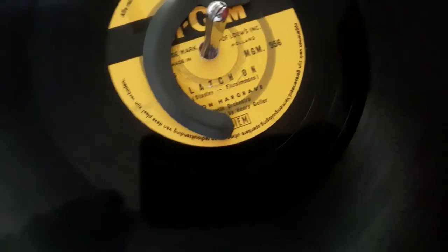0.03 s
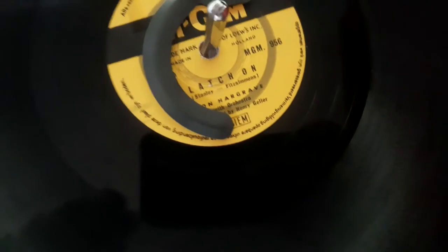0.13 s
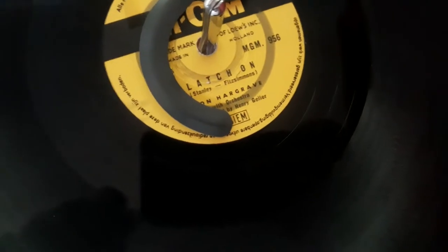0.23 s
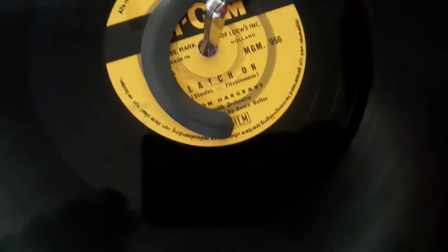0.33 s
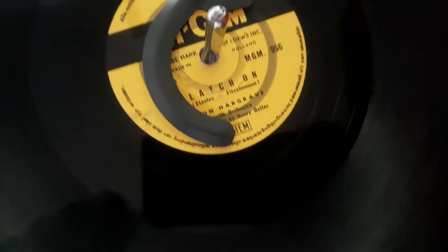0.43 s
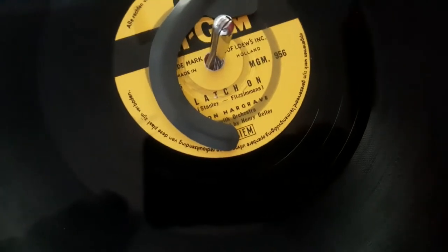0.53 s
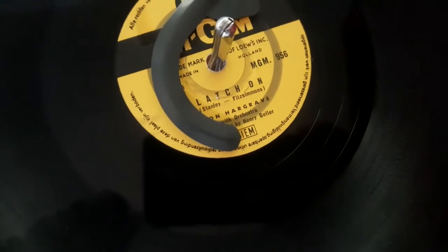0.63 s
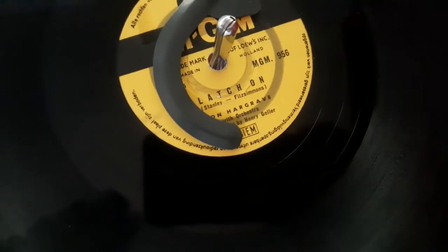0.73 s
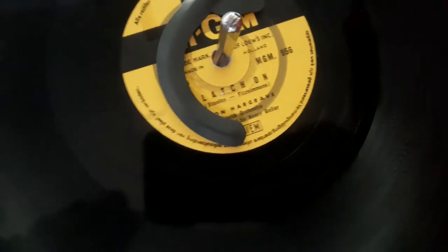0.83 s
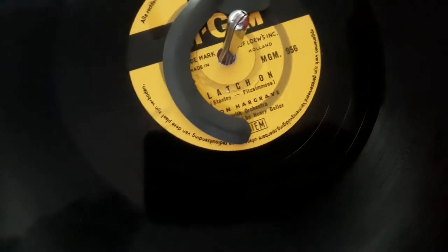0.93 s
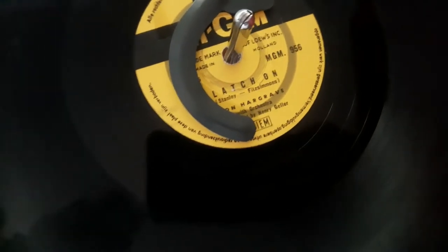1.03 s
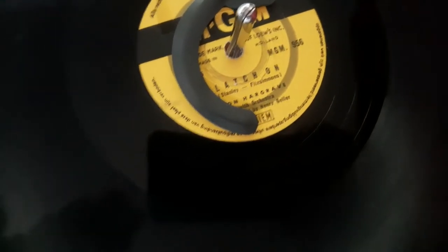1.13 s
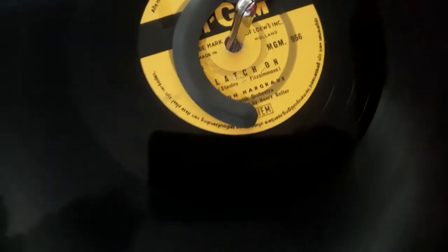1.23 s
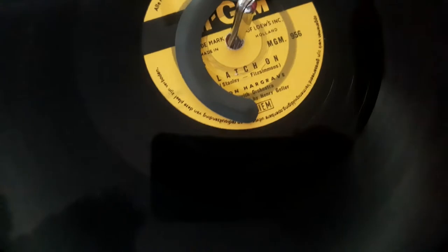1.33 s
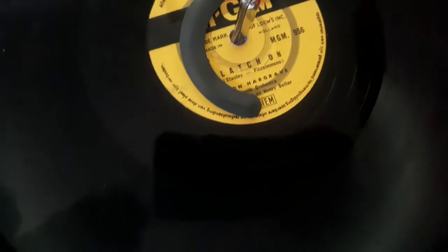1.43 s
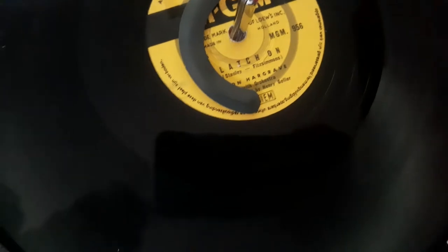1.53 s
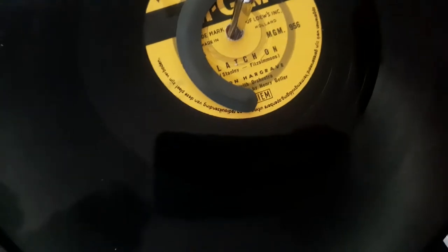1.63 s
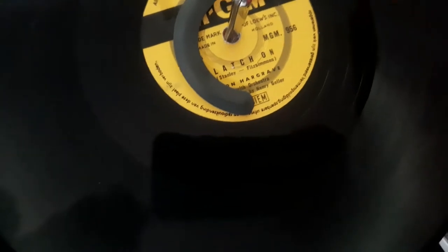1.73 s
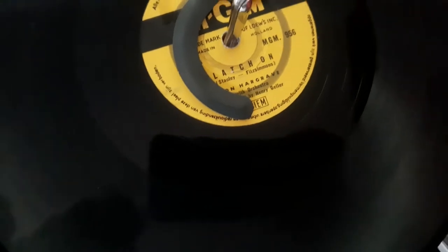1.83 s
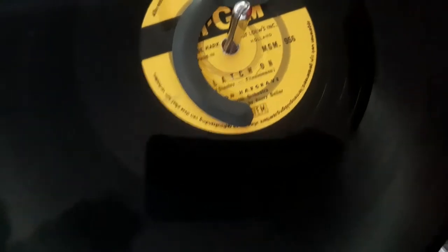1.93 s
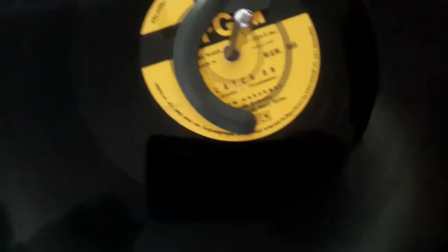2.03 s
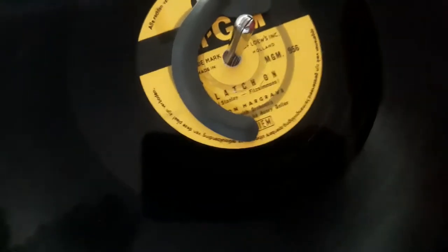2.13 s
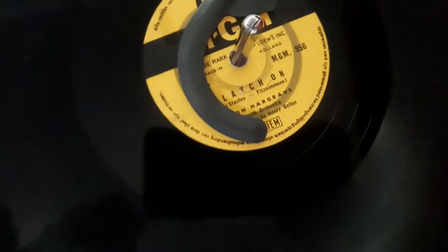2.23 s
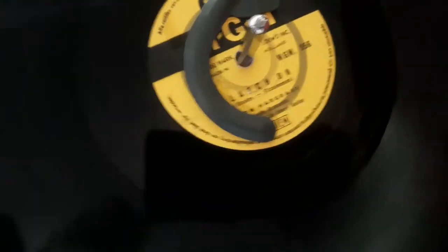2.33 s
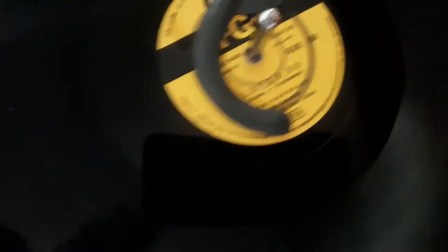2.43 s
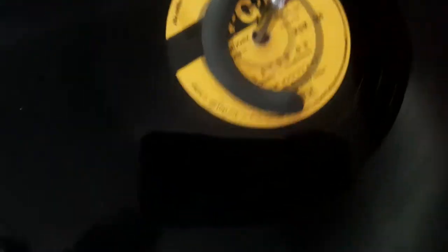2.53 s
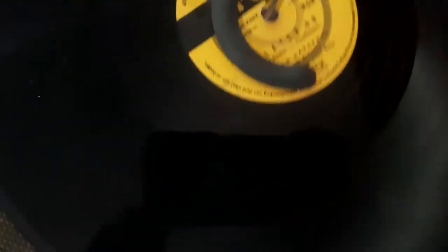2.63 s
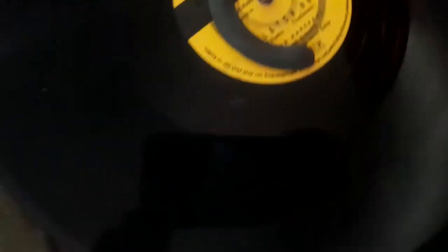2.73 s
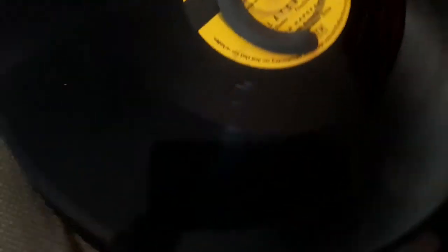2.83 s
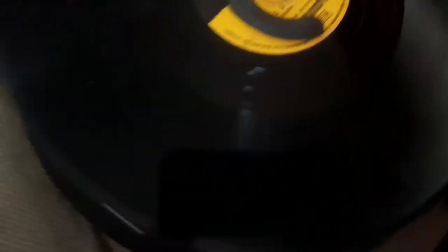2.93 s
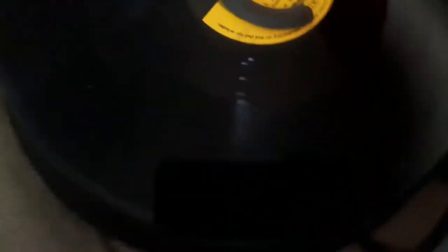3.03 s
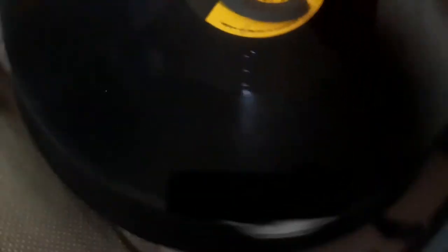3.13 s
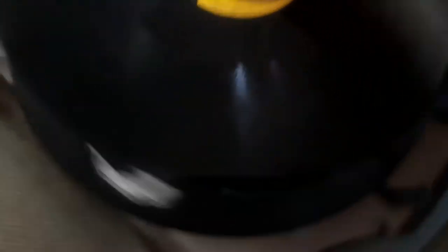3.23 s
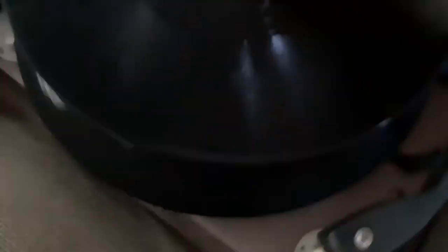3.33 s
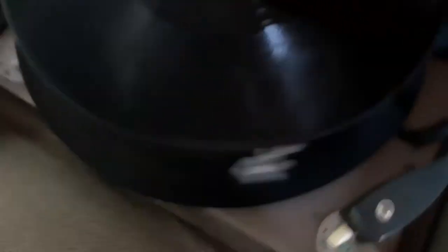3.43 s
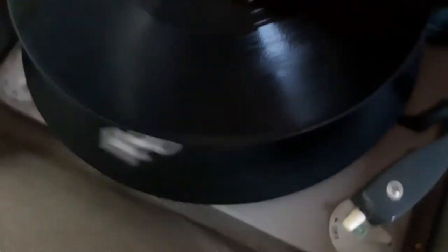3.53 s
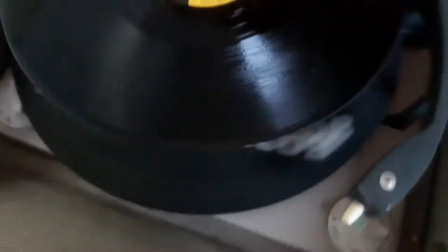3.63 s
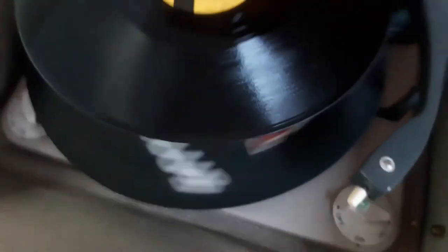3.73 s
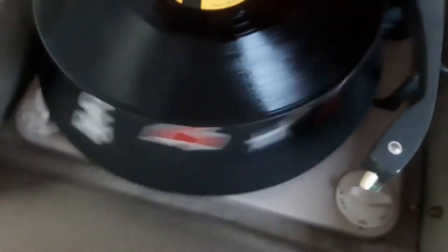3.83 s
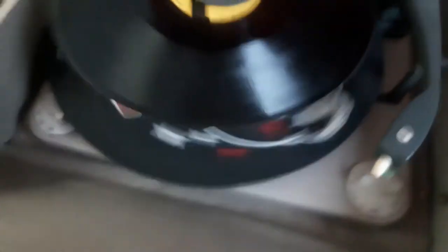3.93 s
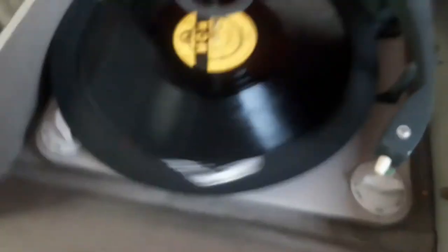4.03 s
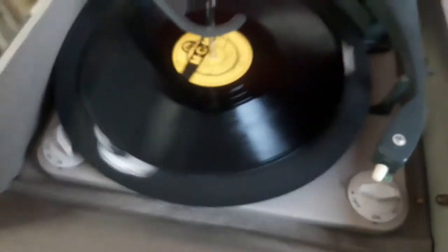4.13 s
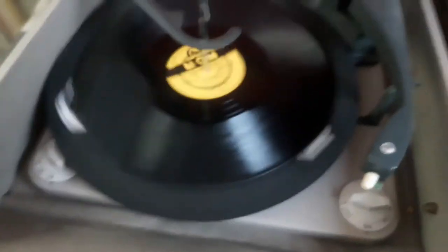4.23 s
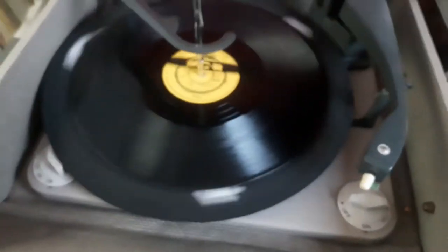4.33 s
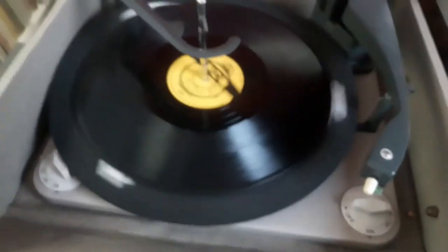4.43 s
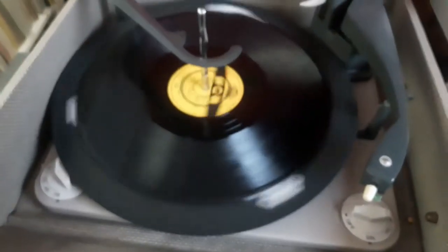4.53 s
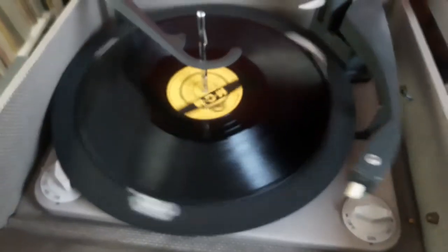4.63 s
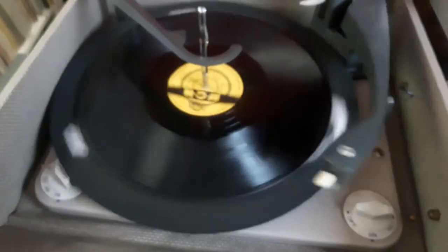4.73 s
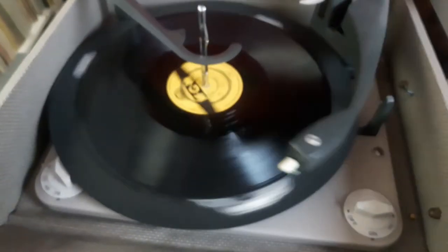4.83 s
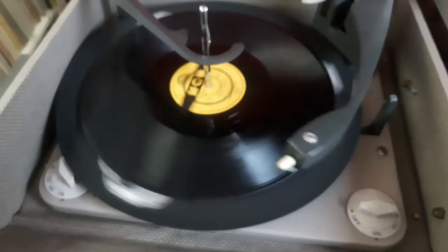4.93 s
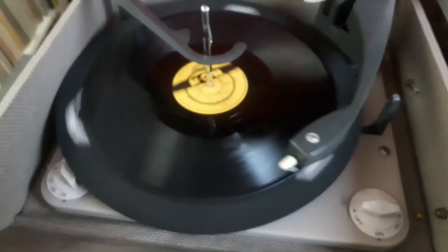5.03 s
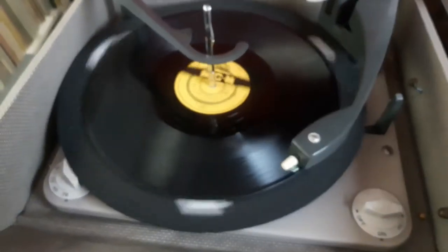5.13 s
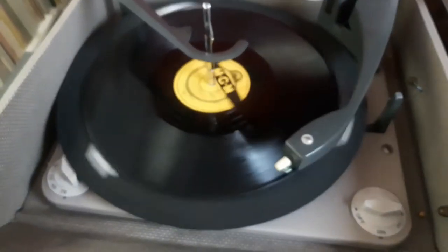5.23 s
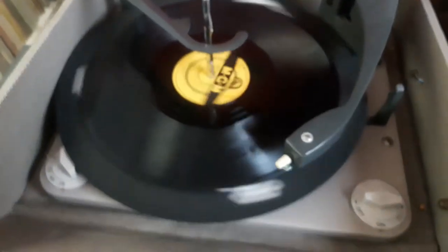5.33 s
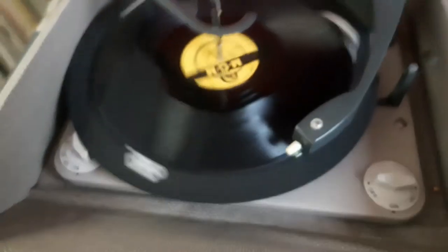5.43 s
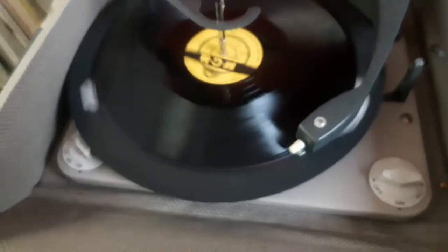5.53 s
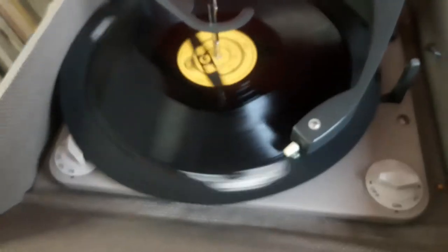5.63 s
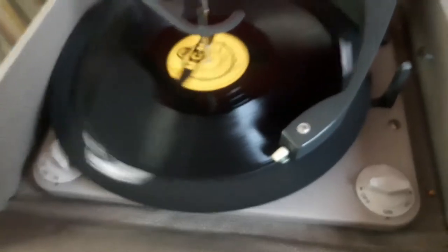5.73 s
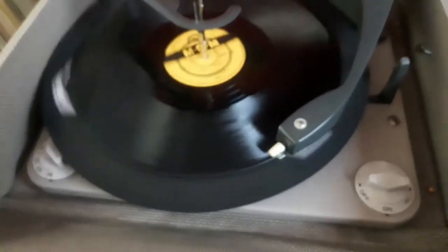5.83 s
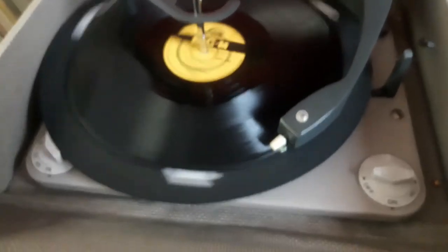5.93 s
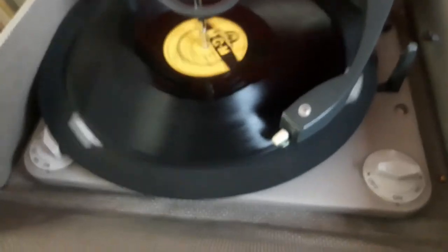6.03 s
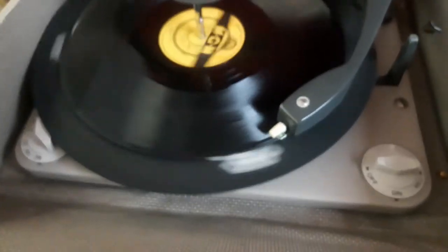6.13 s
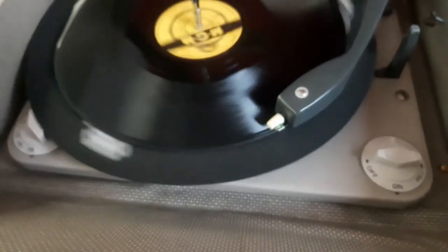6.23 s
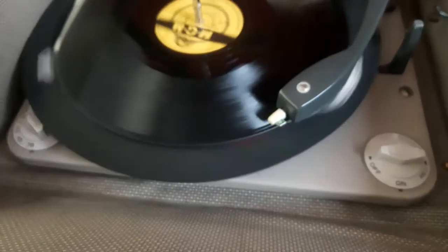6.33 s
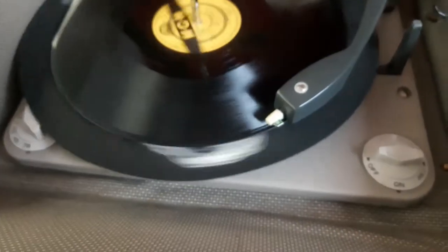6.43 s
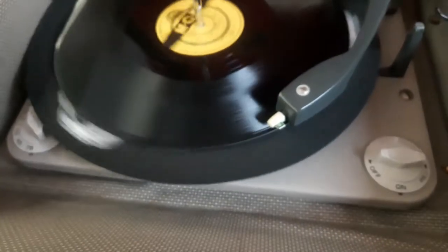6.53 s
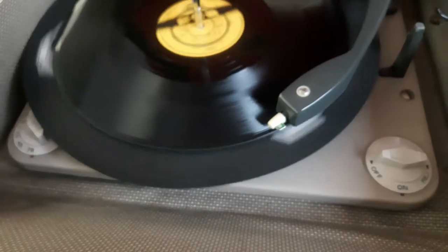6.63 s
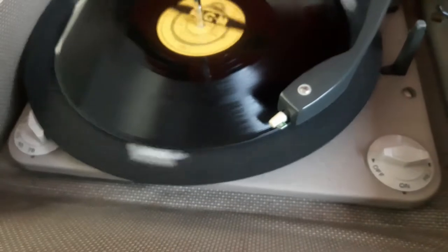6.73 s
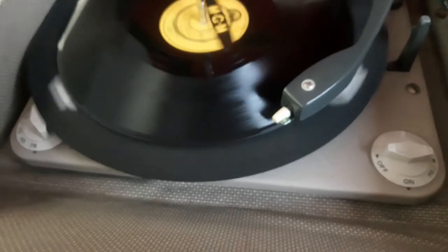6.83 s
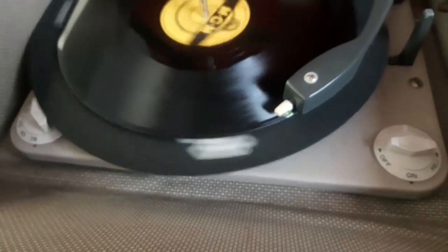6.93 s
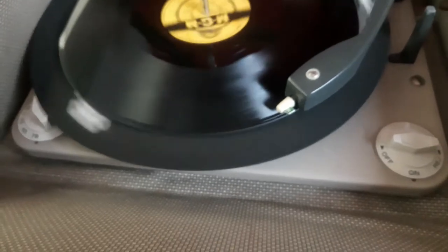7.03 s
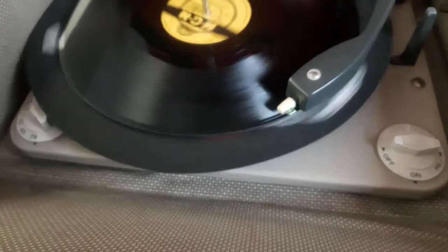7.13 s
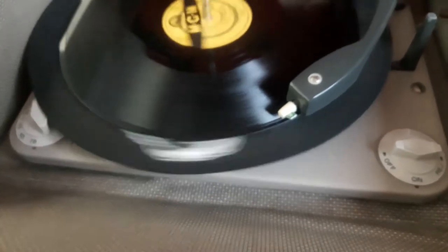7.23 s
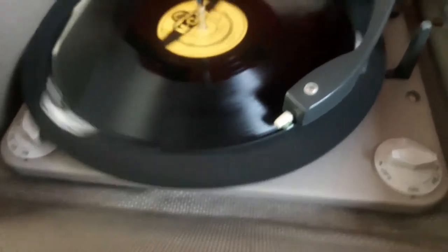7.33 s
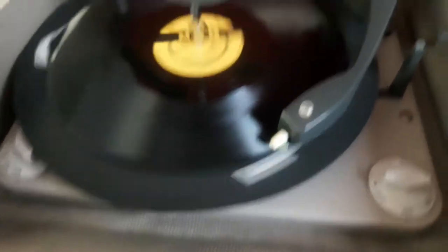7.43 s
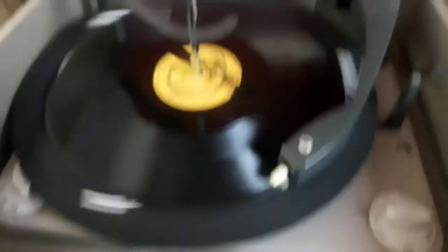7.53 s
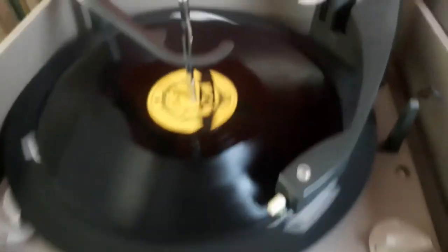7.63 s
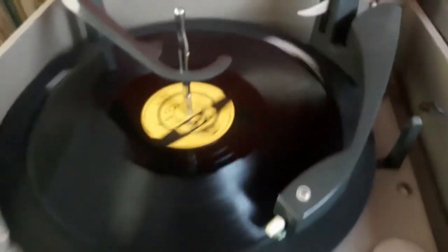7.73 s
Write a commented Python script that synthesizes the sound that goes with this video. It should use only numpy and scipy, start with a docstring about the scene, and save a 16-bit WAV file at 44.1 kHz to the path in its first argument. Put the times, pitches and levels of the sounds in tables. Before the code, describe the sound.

An old record changer hums, clicks and rattles through its cycle, drops a record with a clatter, then the needle thumps down into crackling hiss.

```python
"""An automatic record changer runs through its cycle: its cam gear rattles and trips steel levers.
Impacts excite modes and decaying noise; a record is pushed off the spindle and clatters onto the platter.
The arm swings in; the needle lands with bumps from the loudspeaker, modelled as struck resonances.
The groove then hisses and crackles: noise and sparse grains drive the pickup's resonances.
Mains harmonics and a whirr make the motor's hum, which fades as the listener draws back; faint noise lies beneath."""
import sys
import numpy as np
from scipy import signal
from scipy.fft import rfft, irfft, next_fast_len
from scipy.io import wavfile

SR = 44100
rng = np.random.default_rng(int(sys.argv[2]) if len(sys.argv) > 2 else 0)


def dump_mix(stems):
    """Bounce the given channels to the path in sys.argv[1] as a 16-bit WAV at rate SR."""
    frames = np.atleast_2d(stems).T  # one column per channel
    limited = np.clip(frames, -1, 1)  # hard clip at full scale
    pcm = np.round(limited * 32767).astype(np.int16)
    wavfile.write(sys.argv[1], SR, pcm)


N = 343098
TIME = np.arange(N) / SR
FFT_SIZE = next_fast_len(N)
LOG_HZ = np.log(np.maximum(np.arange(FFT_SIZE // 2 + 1) * SR / FFT_SIZE, 1))

# Levels in the tables are relative: the gains set in scene() are added to them.
# steel levers and pawls hit their stops: start_s, clank_db, tick_above_clank_db
LEVER_BLOWS = [(0.847, -68.5, 13), (0.8871, -60, 8.5), (1.484, -58.5, 1.5), (1.6439, -32, 12.5),
               (1.6996, -50, 2), (1.8833, -55, 17), (1.944, -48.5, 5.5), (2.2019, -64.5, 14),
               (2.7743, -52.5, 6), (2.827, -36.5, 0.5), (2.9876, -46, 7.5), (3.2434, -55, 11.5),
               (3.295, -19, 10), (3.3125, -21, 8), (3.3319, -35.5, 1), (3.4147, -52, 10), (4.308, -47, 8),
               (4.3183, -29.5, 11), (4.3332, -36, 3.5), (4.4385, -39.5, 3), (4.4851, -39, 7),
               (4.7873, -55, 13), (4.8824, -50.5, 9.5), (4.935, -48.5, 5.5), (5.07, -56.5, 5.5),
               (5.1205, -53.5, 8), (5.1405, -43, 0), (5.1465, -32.5, 3)]
# the falling record hits spindle and platter: start_s, clank_db, tick_above_clank_db, extra_knock_db
RECORD_BLOWS = [(3.5708, -45, 11.5, -3), (3.5937, -42.5, 11.5, -3.5), (3.6185, -38.5, 14, 4),
                (3.6445, -27, 18, 1.5), (3.6722, -33.5, 15, 1), (3.7324, -41.5, 18.5, 1),
                (3.7509, -28.5, 3, 1), (3.7793, -33, 10, 1), (3.7865, -28.5, 2, 1),
                (3.8362, -30, 6.5, -3.5), (3.8585, -37.5, -1, -13), (3.905, -38, 10, -2),
                (3.938, -33, 13, 3), (3.9555, -30.5, 15.5, -1.5), (3.9913, -46, 17, -2),
                (4.0317, -27.5, 8.5, 1.5)]
# between those blows the record wobbles and chatters on the spindle: start_s, end_s
WOBBLES = [(3.69, 3.72), (3.80, 3.82), (3.975, 4.02)]
CHATTER_GAP_S = 0.02
CHATTER_DB, CHATTER_TICK_DB, CHATTER_SCATTER_DB = -41, 9.5, -2.5
KNOCK_GROWTH = 0.81  # dB of knock per dB of strength: harder blows sound brighter
LEVER_KNOCK_DB, RECORD_KNOCK_DB = -11, -6.5
KNOCK_NEARNESS = 0.57  # share of the motor's fading that the knocks follow
# registers of a contact: centre_hz, gain_db, crack_t60_s (before stretch), linger_db, linger_t60_s
REGISTERS = [(330, -10.5, 0.21, -9, 0.41), (860, -2, 0.067, -5.5, .2), (3840, -1, 0.093, -9, 0.17),
             (11400, -3, 0.05, -14, 0.18)]
# spectrum of a contact: frequency_hz, density_db (per Hz)
CLATTER_SPECTRUM = [(200, -26), (350, -14), (490, -10), (745, 3.5), (1000, -5.5), (1200, 0.5), (1450, -8),
                    (2300, -5.5), (4000, -4), (6000, -10), (8400, -22), (10300, -9.5), (15800, -16.5)]
CRACK_ATTACK_S = 0.0014
BODY_LIMIT_DB = -34.5  # ceiling of the lowest register's knock, before the register's gain
# modes of the steel deck: frequency_hz, level_db, t60_s
DECK_MODES = [(350, -15.5, 0.26), (608.4, -10, 0.09), (740, -8.5, 0.071), (1108, -9.5, 0.16),
              (1247, -9, 0.12), (1634, -8.5, 0.1), (2770, -11.5, 0.12), (2830, -17, 0.067),
              (3380, -19, 0.11), (3870, -17, 0.068), (4260, -12.5, 0.046), (10620, -14, 0.071)]
# levers, arm and record sing out after some blows: start_s, t60_s, modes (frequency_hz, level_db)
SINGING_PARTS = [(1.647, 0.067, [(1734, -33), (5080, -33), (10430, -33)]), (2.776, 0.068, [(665, -33.5)]),
                 (3.298, 0.14, [(723, -25.5), (805, -33.5), (1122, -25.5), (2696, -31), (3443, -24),
                 (3893, -28), (3978, -21.5), (5359, -31), (10643, -27)]), (3.647, 0.039, [(676, -27.5)]),
                 (3.674, 0.077, [(2850, -21)]), (3.752, 0.056, [(660, -24)]), (3.787, 0.077, [(1250, -27)]),
                 (3.837, 0.029, [(3850, -27), (4220, -18)]), (4.881, 0.057, [(2890, -40.5)]),
                 (5.952, .075, [(1165, -35)])]
# echoes from the open lid and the walls of the case: delay_s, level_db
CASE_ECHOES = [(.0031, -16), (.0074, -16), (0.013, -16)]
# dull thuds in the panels of the case: start_s, level_db, pitch_hz
THUDS = [(0.667, -53, 240), (1.555, -56, 340), (1.69, -40.5, 342), (1.954, -59, 350), (2.776, -43, 356),
         (3.587, -34.5, 333), (3.8, -31, 358), (5.375, -43, 510)]
# modes of a panel: pitch_multiple (ratio), level_db
PANEL_MODES = [(1, -1.5), (1.19, -4.5), (1.85, -9)]
THUD_CYCLES = 37  # a panel mode falls by 60 dB in this many cycles
# jolts that rock the deck on its springs: start_s, knock_db, boom_db
JOLTS = [(2.456, -42.5, -54.5), (3.954, -24.5, -51), (4.022, -16, -41), (5.376, -37, -60),
         (5.994, -26, -45.5), (7.354, -41, -42), (7.4022, -14.5, -34.5), (7.48, -25, -35)]
# strokes of the cam (engage, push the record, lift, swing and lower the arm): start_s, end_s, grind_db, rattle_db
CAM_STROKES = [(1.95, 2.763, -74.5, -87), (2.765, 3.36, -54, -60), (4.282, 4.678, -67, -66.5),
               (4.89, 5.15, -61, -67.5), (5.203, 5.904, -62.5, -88)]
STROKE_ATTACK_S, STROKE_SAG_DB_PER_S = 0.016, 9
STROKE_RELEASE_S = 0.22  # time constant
TOOTH_HZ, FIRST_TOOTH_S, TOOTH_SCATTER_DB = 39.32, 2.885, 1.5
# spectra of the gear's grind and of its tooth clicks: frequency_hz, density_db (per Hz)
GRIND_SPECTRUM = [(280, -24), (350, -2.5), (500, -12.5), (620, 5.5), (720, 3.5), (950, -11), (1170, 0.5),
                  (1400, -18.5), (1700, -8.5), (2400, -25)]
TEETH_SPECTRUM = [(1500, -5), (2400, -12.5), (2950, 0), (3300, -6), (3700, -4), (4900, -9), (8300, -22),
                  (10500, -5.5), (15500, -15)]
# pitch of the pawl as it is pushed along: time_s, pitch_hz
PAWL_PITCH = [(2.98, 3450), (3.2, 3150), (4.6, 2930)]
# sliding push rod, record on the spindle and arm lift: start_s, end_s, from_hz, to_hz, width_hz, level_db
SLIDES = [(3.03, 3.296, 1630, 1780, 260, -64), (3.61, 3.736, 2960, 2830, 110, -48.5),
          (3.9, 3.96, 740, 910, 110, -40), (3.955, 4.071, 815, 745, 45, -34),
          (3.955, 4.017, 2830, 3050, 110, -45), (4.11, 4.195, 12170, 13500, 90, -72.5),
          (4.68, 4.771, 13500, 12380, 110, -73), (5.3, 5.432, 110, 380, 300, -61.5)]
# the needle lands, skids into the groove and meets flaws: start_s, bump_db, scratch_db
NEEDLE_HITS = [(5.514, -30, -71), (5.5642, -43.5, -57), (5.606, -39, -76), (5.6557, -51, -43.5),
               (5.6705, -43, -42), (5.705, -36.5, -51), (5.804, -40.5, -57.5), (5.9506, -39.5, -38),
               (5.961, -26.5, -73), (5.977, -28, -72), (6.271, -45.5, -59.5), (7.356, -48, -65),
               (7.4025, -40, -55), (7.481, -37.5, -46.5)]
# modes of the loudspeaker in its case: frequency_hz, level_db, t60_s
SPEAKER_MODES = [(169, -5, 0.11), (231.6, -5, 0.13), (283, -0.5, 0.053), (344, 1.5, 0.12),
                 (441, -11, 0.067), (545, -8.5, 0.043)]
# the needle lands; a rumble sets in; the needle reaches the close-cut grooves
LANDING_S, RUMBLE_S, FIRST_TURN_S = 5.52, 7.12, 7.32
# the needle drags as it settles and on worn patches: peak_s, level_db, rise_db_per_s, fall_db_per_s
DRAGS = [(5.68, -7, 55, 54), (7.05, -17.5, 45, 60.5), (7.389, 2.5, 120, 158)]
# level of the groove's hiss: time_s, level_db
HISS_LEVEL = [(5.53, -65.5), (5.66, -60.5), (6.08, -55), (6.25, -59.5), (6.87, -60), (7.06, -54),
              (7.23, -68), (7.38, -46.5), (7.56, -54)]
# resonances of the pickup: centre_hz, width_hz, landing_level_db, change_db_per_s
PICKUP_RESONANCES = [(2420, 650, -17, -2), (3600, 2540, -9.5, -4.5), (5930, 2050, -12.5, 2.5),
                     (7190, 670, -13.5, 4.5), (10130, 730, -4, -1.5), (10970, 730, -8.5, 0),
                     (13200, 1600, -15.5, 4.5), (14550, 440, -6.5, -3), (15400, 520, -11, -0.5)]
HISS_WAVER_DB = 1.0
# spectra of groove scrape, roar and rumble: frequency_hz, density_db (per Hz)
SCRAPE_SPECTRUM = [(1400, -1.5), (2000, 3), (2300, 6.5), (3900, 7.5), (5400, 0)]
ROAR_SPECTRUM = [(100, -11), (160, 6), (225, 2.5), (350, 4), (520, -3), (675, 0.5), (960, -8), (1140, -8),
                 (1400, -15.5)]
RUMBLE_SPECTRUM = [(28, -29), (45, -3.5), (75, -1), (120, -12.5), (200, -16)]
MAINS_HZ = 50.4
# motor hum before wavering and distance: mains_multiple (ratio), rms_db
HUM_HARMONICS = [(3, -74), (4, -80.5), (5, -78.5), (6, -86.5), (7, -82)]
# how the motor fades as the listener draws back from the deck: time_s, gain_db
HUM_LEVEL = [(0, -1.5), (3.2, 1), (4.2, -13), (7.78, -19)]
# spectra of the idler wheel's whirr and of the background: frequency_hz, density_db (per Hz)
WHIRR_SPECTRUM = [(90, -6), (160, -3), (260, -2.5), (380, -3.5), (550, -13.5)]
FLOOR_SPECTRUM = [(30, -12), (65, 4), (130, -8), (400, -12.5), (1200, -13), (3300, -19), (6000, -23.5),
                  (8500, -31.5), (10500, -19.5), (15800, -22.5)]
FLOOR_DB = -76
CUTOFF_HZ = 15800


def contacts():
    """Impact strength: rows of (s, tick dB, clank dB, knock dB); knock follows strength and nearness."""
    beats = np.concatenate([np.arange(start, end, CHATTER_GAP_S) for start, end in WOBBLES])
    chatter = []
    for s, (late, force) in zip(beats, rng.standard_normal((len(beats), 2))):
        clank = CHATTER_DB + CHATTER_SCATTER_DB * force
        chatter.append((s + CHATTER_GAP_S * late / 10, clank, CHATTER_TICK_DB, 0))
    lever_blows = [(*row, 0) for row in LEVER_BLOWS]
    record_blows = list(RECORD_BLOWS) + chatter
    hits = []
    for rows, knock_db in [(lever_blows, LEVER_KNOCK_DB), (record_blows, RECORD_KNOCK_DB)]:
        for s, clank, tick_db, extra_db in rows:
            nearness_db = KNOCK_NEARNESS * curve(HUM_LEVEL, s)
            knock = knock_db + extra_db + KNOCK_GROWTH * clank + nearness_db
            hits.append((s, clank + tick_db, clank, knock))
    return hits


def cracks(rows, snap_db, stretch):
    """High modal density: noise in four registers gives a snap, a fast crack and a weaker lingering ring."""
    s, tick, clank, knock = np.transpose(rows)
    centres = np.log([row[0] for row in REGISTERS])
    age = TIME[:SR // 2]
    attack = 1 - np.exp(-(age / CRACK_ATTACK_S) ** 2)
    snap = from_db(snap_db - 60 * age / 0.025) ** 2
    register_levels = [np.minimum(knock, BODY_LIMIT_DB), knock, clank, tick]
    out = 0
    for k, (levels, row) in enumerate(zip(register_levels, REGISTERS)):
        hz, gain_db, t60, linger_db, linger_t60 = row
        crack = from_db(-60 * age / (t60 * stretch)) ** 2
        linger = from_db(linger_db - 60 * age / linger_t60) ** 2
        shape = attack * (snap + crack + linger)
        power = np.zeros(N)
        for at, level in zip((s * SR).astype(int), levels):
            power[at:at + len(age)] += from_db(level + gain_db) ** 2 * shape[:N - at]
        # neighbouring registers cross-fade on a logarithmic frequency scale
        register = np.interp(LOG_HZ, centres, np.arange(len(centres)) == k)
        out = out + np.sqrt(power) * noise(CLATTER_SPECTRUM, register)
    return out


def deck(hits, ring_db, scatter_db):
    """Modal excitation: each contact rings the deck's modes by amounts that depend on where it lands."""
    s, tick, clank, knock = np.transpose(hits)
    chance = rng.standard_normal((len(s), len(DECK_MODES), 2))
    out = 0
    for k, (hz, db, t60) in enumerate(DECK_MODES):
        force = knock if hz < 2000 else clank if hz < 8000 else tick
        sizes = from_db(force + db + ring_db + scatter_db * chance[:, k, 0])
        signs = np.sign(chance[:, k, 1])
        out = out + ring(strike(s, sizes * signs), hz, t60)
    return out


def small_parts(hits, ring_db, t60, count):
    """Free vibration: the small part that was hit rings in a few brief modes at random pitches."""
    out, age = np.zeros(N), TIME[:SR // 7]
    fade = from_db(-60 * age / t60) * (1 - np.exp(-age / 0.001))
    for s, tick, clank, knock in hits:
        at = int(s * SR)
        for db, low, high in [(knock - 4, 600, 2000), (clank, 2300, 5800), (tick - 6, 9400, 15500)]:
            hz, phase = rng.uniform(low, high, (count, 1)), rng.random((count, 1))
            modes = np.sin(2 * np.pi * (hz * age + phase)).sum(axis=0)
            out[at:at + len(age)] += from_db(db + ring_db) * fade * modes
    return out


def singing(ring_db):
    """Selective excitation: a part's own modes stand out when a blow hits it squarely."""
    out = 0
    for s, t60, modes in SINGING_PARTS:
        for hz, db in modes:
            out = out + panel(strike([s], from_db(db + ring_db)), hz, t60)
    return out


def in_case(x):
    """Early reflection: add the case's short echoes, scaled as if their powers add."""
    echoes, power = 0, 1
    for delay, db in CASE_ECHOES:
        echoes = echoes + from_db(db) * np.pad(x, (int(delay * SR), 0))[:N]
        power = power + from_db(db) ** 2
    return (x + echoes) / np.sqrt(power)


def thuds(knock_db):
    """Panel resonance: a soft blow excites a few damped modes of one panel of the case."""
    out = 0
    for s, db, pitch_hz in THUDS:
        blow = strike([s], from_db(db + knock_db))
        for k, (ratio, level) in enumerate(PANEL_MODES):
            hz = pitch_hz * ratio
            out = out + (-1) ** k * from_db(level) * panel(blow, hz, THUD_CYCLES / hz)
    return out


def jolts(boom_db, boom_hz, boom_t60, knock_db, knock_hz, knock_t60):
    """Mass on springs: a jolt gives a heavily damped knock and a low boom of the rocking deck."""
    s, knock, boom = np.transpose(JOLTS)
    booms = panel(strike(s, from_db(boom + boom_db)), boom_hz, boom_t60)
    return booms + panel(strike(s, from_db(knock + knock_db)), knock_hz, knock_t60)


def gear(grind_db, rattle_db, sliding):
    """Tooth-mesh modulation: teeth click in turn, each with its own force, and grind in between."""
    grind, rattle = cam_load()
    teeth = TOOTH_HZ * (TIME - FIRST_TOOTH_S) + 0.04 * drift(5)
    force = from_db(TOOTH_SCATTER_DB * rng.standard_normal(1000))[np.floor(teeth).astype(int)]
    since_tooth_s = (teeth % 1) / TOOTH_HZ
    click = force * np.exp(-since_tooth_s / 0.008)
    grinding = from_db(grind_db) * grind * rms_one(sliding + click) * noise(GRIND_SPECTRUM)
    rattling = from_db(rattle_db) * rattle * rms_one(0.3 + click) * noise(TEETH_SPECTRUM)
    return grinding + rattling


def cam_load():
    """Load envelope: grind and rattle gains rise quickly in each stroke, ease off and let go."""
    grind, rattle = 0, 0
    for start, end, grind_db, rattle_db in CAM_STROKES:
        sag = from_db(-STROKE_SAG_DB_PER_S * np.maximum(TIME - start, 0))
        release = np.exp(-np.maximum(TIME - end, 0) / STROKE_RELEASE_S)
        load = rise(start, STROKE_ATTACK_S) * sag * release
        grind = np.hypot(grind, from_db(grind_db) * load)
        rattle = np.hypot(rattle, from_db(rattle_db) * load)
    return grind, rattle


def pawl(level_db, width_hz):
    """Repeated impulse: a pawl drops off each loaded tooth and rings, lower as it is pushed along."""
    teeth = FIRST_TOOTH_S + np.arange(int(3 * TOOTH_HZ)) / TOOTH_HZ
    clicks = strike(teeth, from_db(2 * TOOTH_SCATTER_DB * rng.standard_normal(len(teeth))))
    rattle = cam_load()[1]
    return from_db(level_db) * rattle * gliding_ring(clicks, curve(PAWL_PITCH), width_hz)


def slides(slips_per_s, edge_s):
    """Stick-slip friction: uneven slips drive a resonance that shifts as the contact point travels."""
    out = np.zeros(N)
    for start, end, from_hz, to_hz, width_hz, db in SLIDES:
        age = TIME[:int((end - start) * SR)]
        chance = rng.random((len(age), 2))
        slips = (chance[:, 0] < slips_per_s / SR) * (chance[:, 1] - 0.5)
        fade = np.clip(np.minimum(age, age[-1] - age) / edge_s, 0, 1)
        squeak = gliding_ring(slips, np.linspace(from_hz, to_hz, len(age)), width_hz)
        at = int(start * SR)
        out[at:at + len(age)] += from_db(db) * fade * squeak
    return out


def needle(bump_db, skid_db, tick_db, tick_growth, knock_db):
    """Transduced impact: the needle kicks the loudspeaker's modes and scratches across the rim."""
    s, bump, scratch = np.transpose(NEEDLE_HITS)
    kicks = strike(s, from_db(bump + bump_db))
    bumps = 0
    for k, (hz, level, t60) in enumerate(SPEAKER_MODES):
        bumps = bumps + (-1) ** k * from_db(level) * ring(kicks, hz, t60)
    # a light graze mostly ticks; a hard one knocks
    skids = np.transpose([s, tick_db + tick_growth * scratch, scratch, knock_db + scratch])
    return bumps + from_db(skid_db) * cracks(skids, snap_db=-23, stretch=1.86)


def groove(hiss_db, crackle_db, grains_per_s, flutter_db):
    """Surface roughness: wall grain and dust drive the stylus; the loudspeaker adds roar and rumble."""
    hiss = rise(LANDING_S, 0.0092) * from_db(hiss_db + curve(HISS_LEVEL))
    scrape = groove_gain(steady_db=-81, drag_db=-59.5, inner_db=-62.5, inner_s=FIRST_TURN_S)
    roar = groove_gain(steady_db=-71.0, drag_db=-45, inner_db=-71, inner_s=FIRST_TURN_S)
    rumble = groove_gain(steady_db=-81.5, drag_db=-55.5, inner_db=-53.5, inner_s=RUMBLE_S)
    dust = rms_one(rng.laplace(size=N) * (rng.random(N) < grains_per_s / SR))
    wall = rng.standard_normal(N) + from_db(crackle_db) * dust
    surface = hiss * hiss_bands(wall) + scrape * coloured(wall, SCRAPE_SPECTRUM)
    surface = surface + roar * noise(ROAR_SPECTRUM)
    return surface * from_db(flutter_db * drift(70)) + rumble * noise(RUMBLE_SPECTRUM)


def groove_gain(steady_db, drag_db, inner_db, inner_s):
    """Power summation: a steady part, one that swells with the needle's drag and one that joins late."""
    drag = 0
    for s, db, up, down in DRAGS:
        drag = drag + from_db(db - np.maximum(up * (s - TIME), down * (TIME - s))) ** 2
    inner = from_db(inner_db) ** 2 * rise(inner_s, 0.013)
    power = from_db(steady_db) ** 2 + from_db(drag_db) ** 2 * drag + inner
    return rise(LANDING_S, 0.0081) * np.sqrt(power)


def hiss_bands(wall):
    """Forced resonance: the wall drives pickup bands that waver and grow or fade as the needle moves inward."""
    start = int(LANDING_S * SR)
    age, out = TIME[:N - start], np.zeros(N)
    for hz, width, db, growth in PICKUP_RESONANCES:
        edges = [hz - width / 2, hz + width / 2]
        band = signal.sosfilt(signal.butter(2, edges, "band", fs=SR, output="sos"), wall[start:])
        level_db = db + growth * age + HISS_WAVER_DB * drift(30)[start:]
        out[start:] += from_db(level_db) * rms_one(band)
    return out


def motor(whirr_db, waver_db):
    """Magnetic hum: wavering harmonics of the mains over the broadband whirr of the idler wheel."""
    nearness = from_db(curve(HUM_LEVEL))
    out = from_db(whirr_db) * noise(WHIRR_SPECTRUM)
    for multiple, db in HUM_HARMONICS:
        phase = 2 * np.pi * (round(multiple) * MAINS_HZ * TIME + rng.random())
        out = out + np.sqrt(2) * from_db(db + waver_db * drift(5)) * np.sin(phase)
    return nearness * out


def background():
    """Stationary noise: the faint, steady sound of the quiet room."""
    return from_db(FLOOR_DB) * noise(FLOOR_SPECTRUM)


def strike(times, sizes):
    """Impulse excitation: one click of each size at each time."""
    clicks = np.zeros(N)
    np.add.at(clicks, (np.asarray(times) * SR).astype(int), sizes)
    return clicks


def ring(clicks, hz, t60):
    """Damped oscillator: a unit click starts a decaying sine of height 1."""
    r, w = from_db(-60 / (max(t60, 0.005) * SR)), 2 * np.pi * hz / SR
    # the tiny offset keeps the filter clear of denormal numbers
    return signal.lfilter([0, np.sin(w)], [1, -2 * r * np.cos(w), r * r], clicks + 1e-18)


def panel(clicks, hz, t60):
    """Radiation efficiency: a struck part radiates little below its resonance."""
    high_pass = signal.butter(2, 0.5 * hz, "high", fs=SR, output="sos")
    return signal.sosfilt(high_pass, ring(clicks, hz, t60))


def gliding_ring(clicks, hz, width_hz):
    """Time-varying resonance: clicks ring a filter in a frame that turns at the moving pitch; rms 1."""
    turn = np.exp(2j * np.pi * np.cumsum(hz) / SR)
    pole = np.exp(-np.pi * np.sqrt(2) * width_hz / SR)
    envelope = signal.lfilter([1], np.poly([pole] * 2), clicks / turn + 1e-18)
    return rms_one((turn * envelope).imag)


def coloured(x, spectrum, window=1):
    """Spectral shaping: give x a spectrum that falls steeply beyond its ends; rms 1."""
    hz, db = np.transpose(spectrum)
    beyond = np.abs(LOG_HZ - np.clip(LOG_HZ, np.log(hz[0]), np.log(hz[-1])))
    gain = from_db(np.interp(LOG_HZ, np.log(hz), db) - 40 * beyond)
    return rms_one(irfft(rfft(x, FFT_SIZE) * gain * window, FFT_SIZE)[:N])


def noise(spectrum, window=1):
    """Random excitation: coloured noise, rms 1."""
    return coloured(rng.standard_normal(N), spectrum, window)


def drift(rate):
    """Slow fluctuation: random points, rate per second, with a spread of 1 and joined by lines."""
    return np.interp(TIME * rate, np.arange(4000), rng.standard_normal(4000))


def curve(rows, s=TIME):
    """Linear interpolation: a curve's value at times s."""
    return np.interp(s, *np.transpose(rows))


def rise(start, length):
    """Linear onset: a ramp from 0 to 1."""
    return np.clip((TIME - start) / length, 0, 1)


def from_db(db):
    """Decibel law: level to amplitude gain."""
    return 10 ** (np.asarray(db) / 20)


def rms_one(x):
    """Power normalisation: scale to unit rms."""
    return x / np.sqrt(np.mean(x ** 2) + 1e-20)


def scene():
    """Superposition: changer, record and the quiet room add linearly."""
    hits = contacts()
    levers = in_case(cracks(hits, snap_db=-4.5, stretch=0.86)) + deck(hits, ring_db=-2.0, scatter_db=1)
    levers = levers + small_parts(hits, ring_db=-7, t60=0.054, count=4) + singing(ring_db=-1.5)
    case = thuds(knock_db=0.5)
    case = case + jolts(boom_db=9, boom_hz=85.3, boom_t60=0.063, knock_db=4, knock_hz=325, knock_t60=0.0024)
    drive = gear(grind_db=-1.5, rattle_db=0, sliding=1.0) + pawl(level_db=-10.5, width_hz=260)
    drive = drive + slides(slips_per_s=900, edge_s=0.013)
    landing = needle(bump_db=-4.0, skid_db=-4, tick_db=-16.5, tick_growth=0.49, knock_db=2)
    playing = in_case(groove(hiss_db=-1.0, crackle_db=-1, grains_per_s=770, flutter_db=2.5))
    hum = motor(whirr_db=-73, waver_db=3.5)
    return (levers + case + drive + landing + playing + hum + background())[None]


def record(dry):
    """Band limiting: an elliptic low-pass cuts the top steeply."""
    return signal.sosfilt(signal.ellip(10, 0.3, 70, CUTOFF_HZ, fs=SR, output="sos"), dry)


dry = scene()
out = record(dry)
dump_mix(out)
```